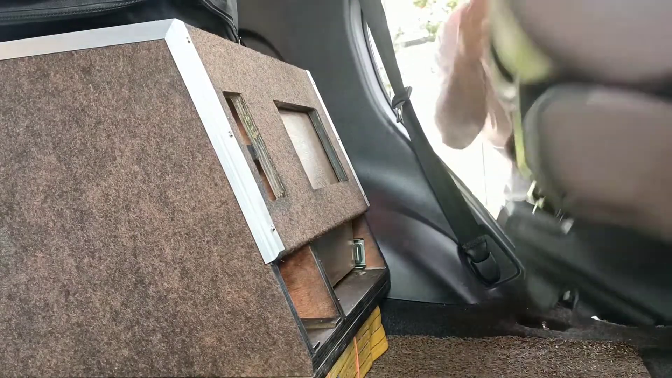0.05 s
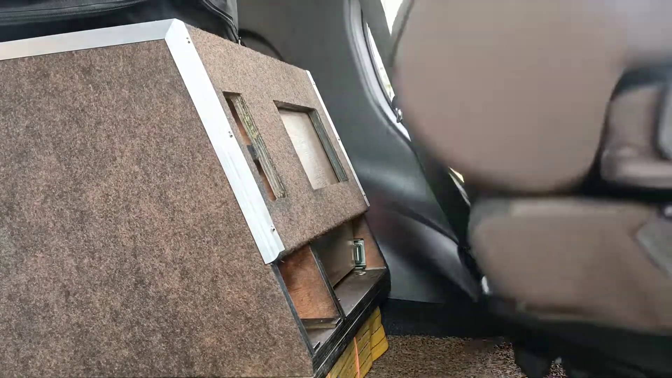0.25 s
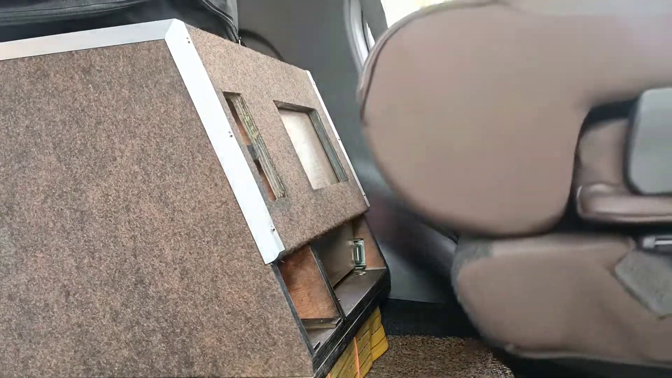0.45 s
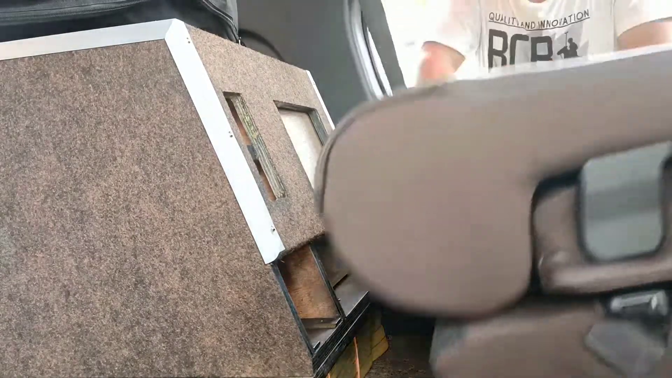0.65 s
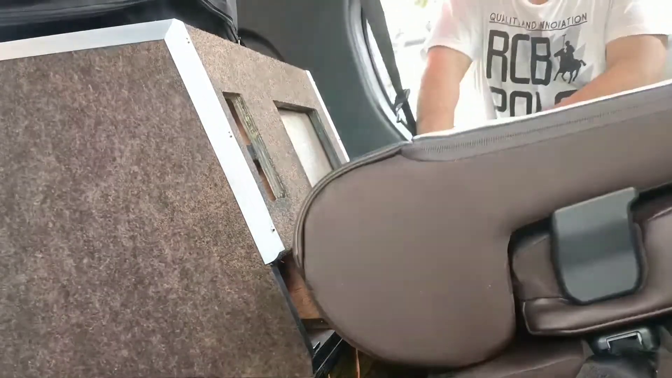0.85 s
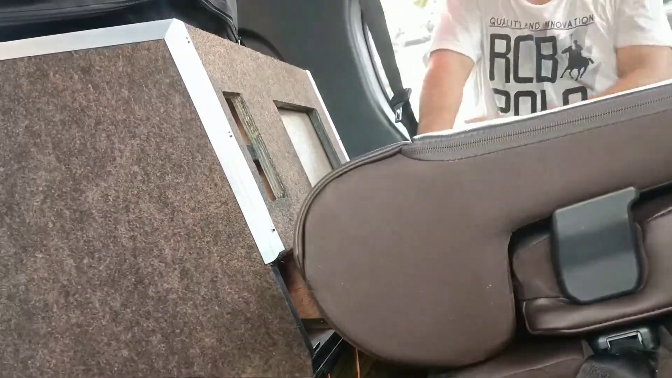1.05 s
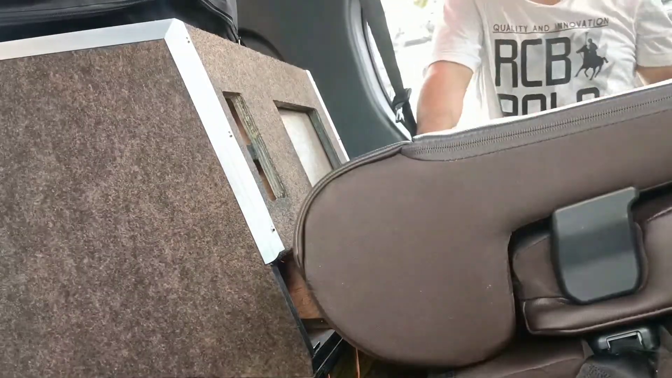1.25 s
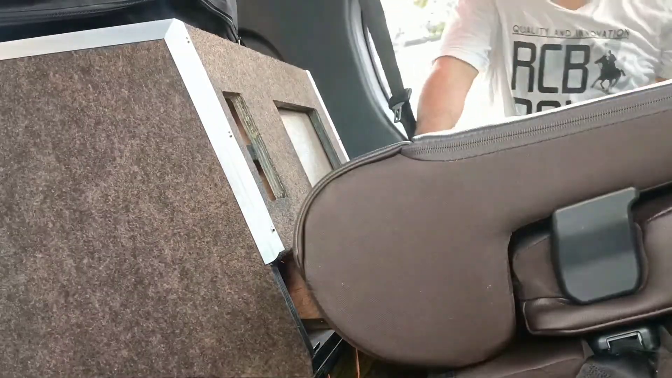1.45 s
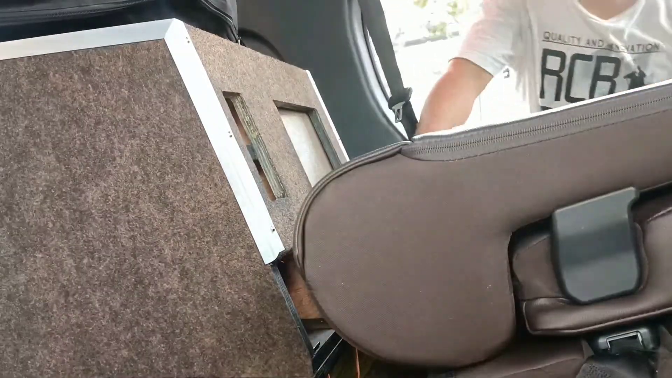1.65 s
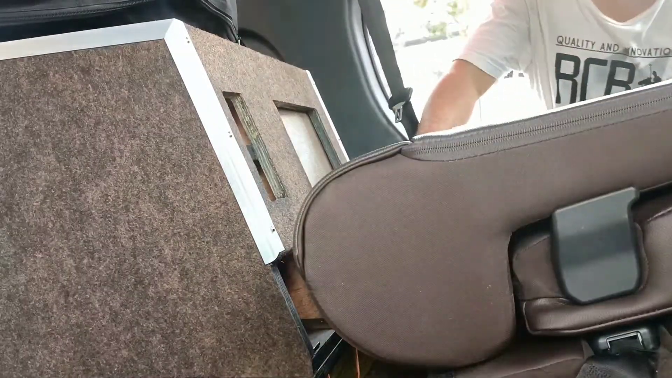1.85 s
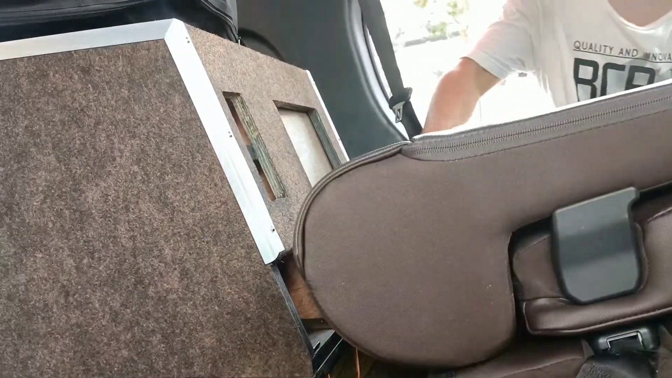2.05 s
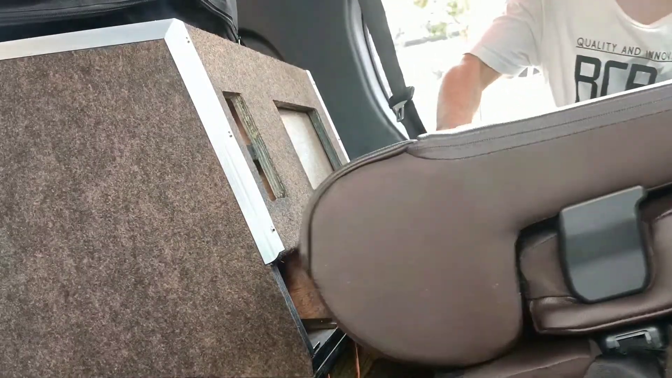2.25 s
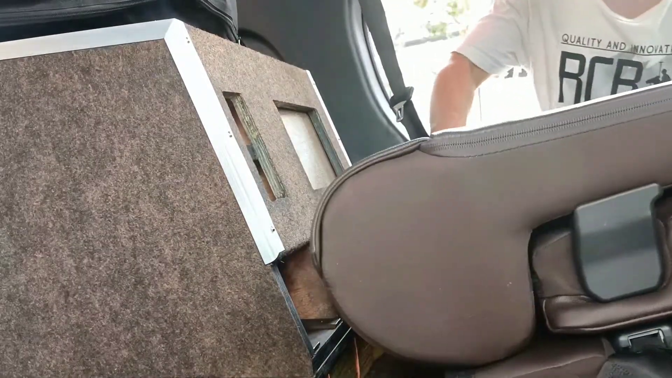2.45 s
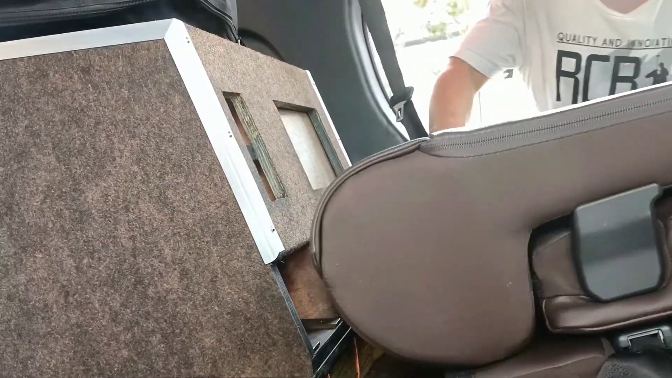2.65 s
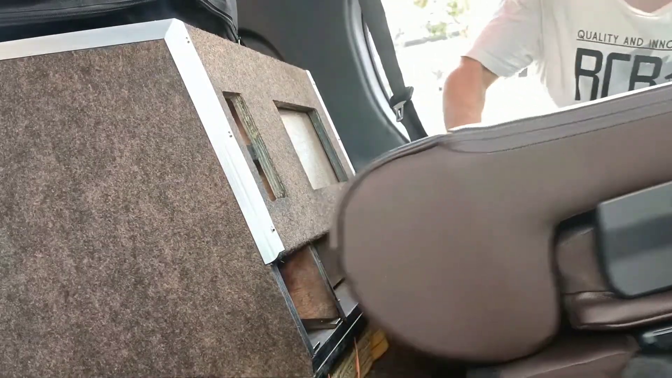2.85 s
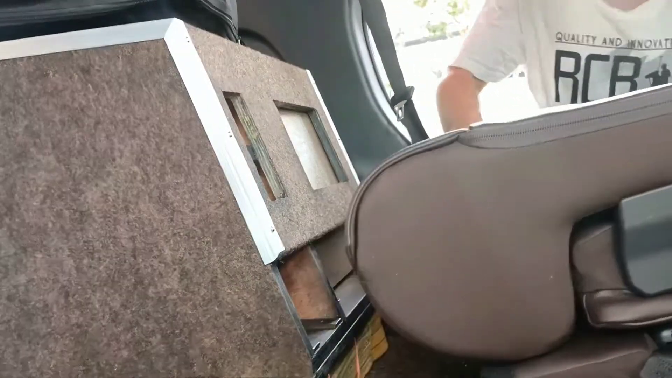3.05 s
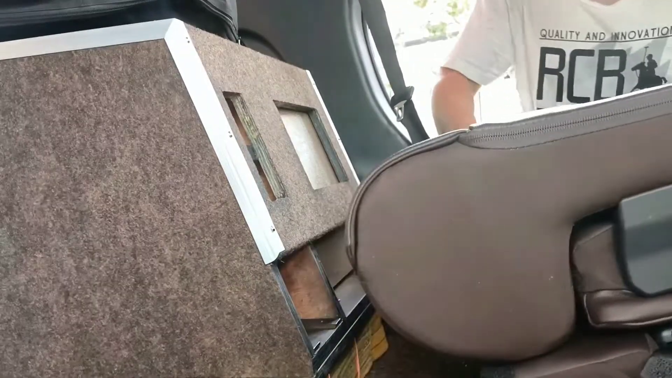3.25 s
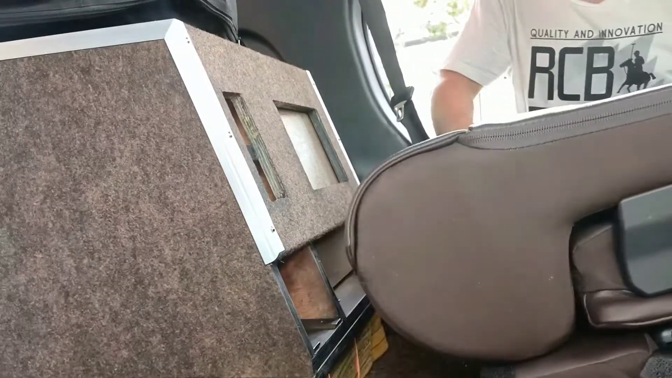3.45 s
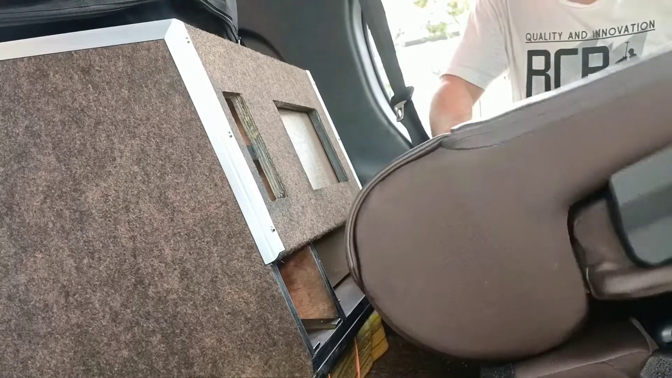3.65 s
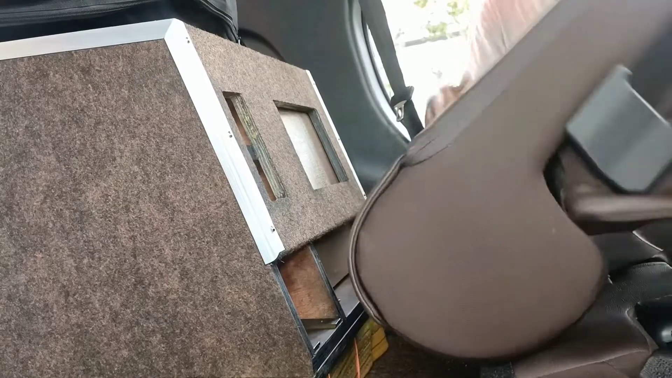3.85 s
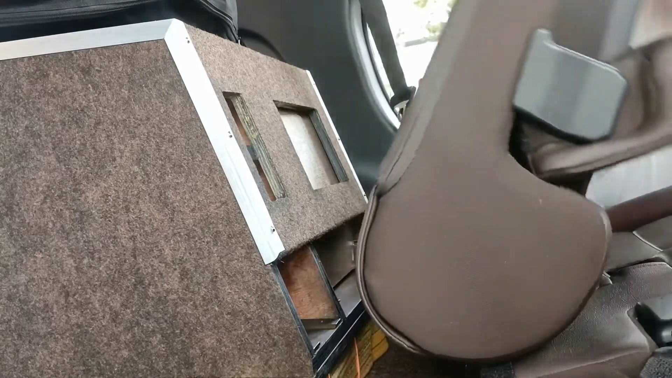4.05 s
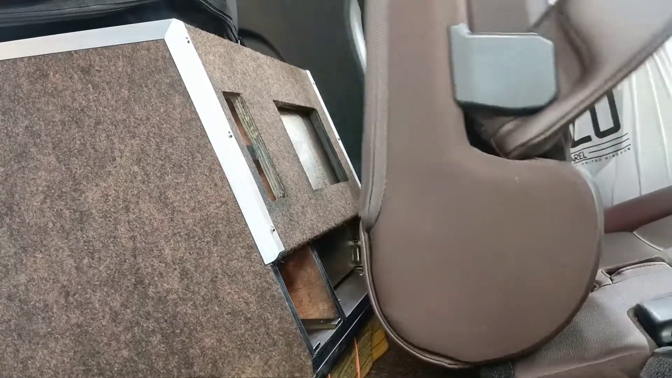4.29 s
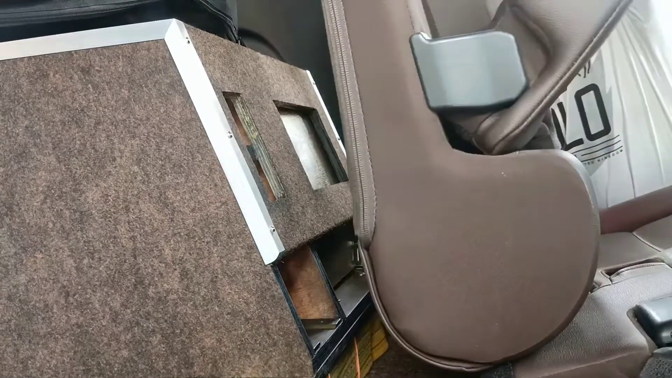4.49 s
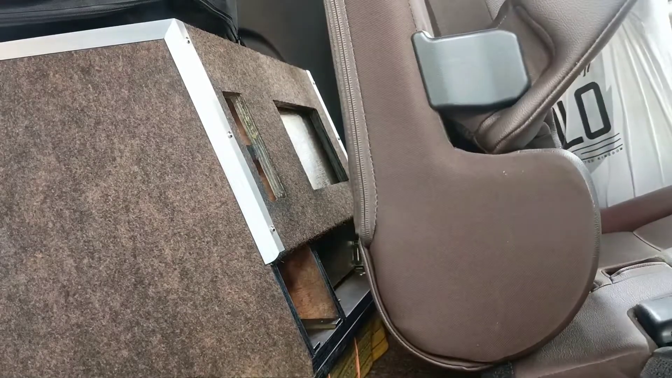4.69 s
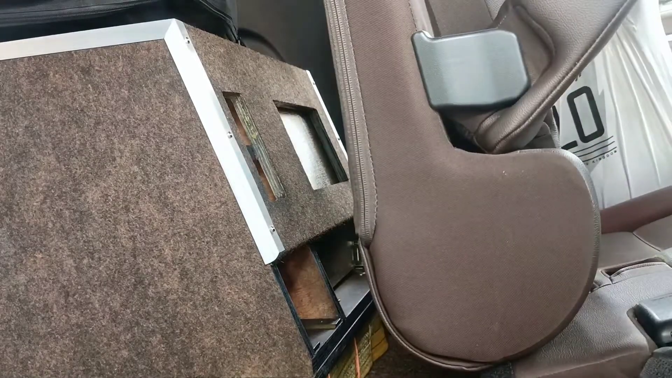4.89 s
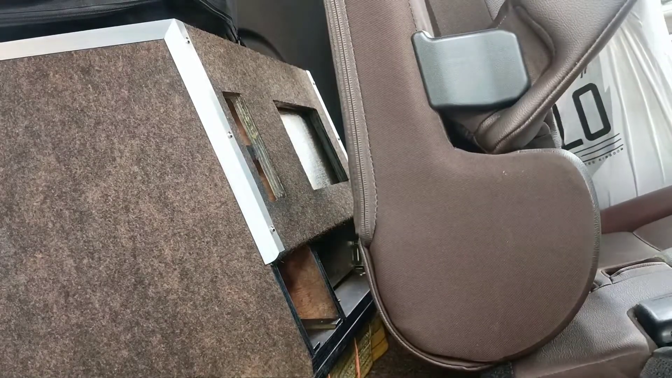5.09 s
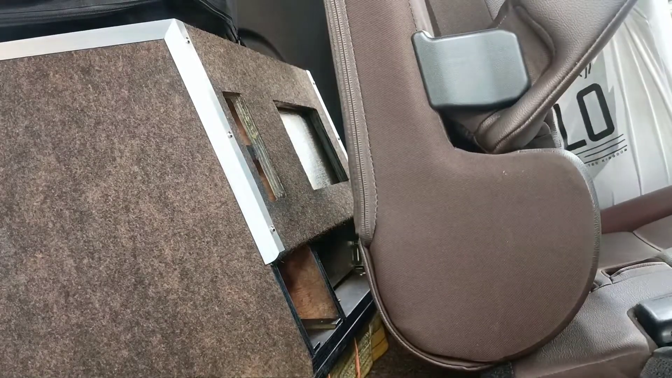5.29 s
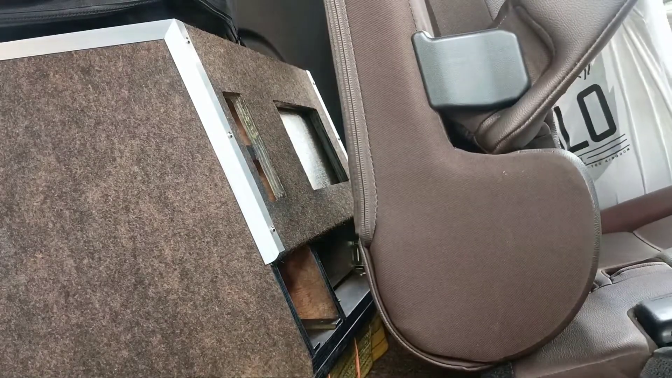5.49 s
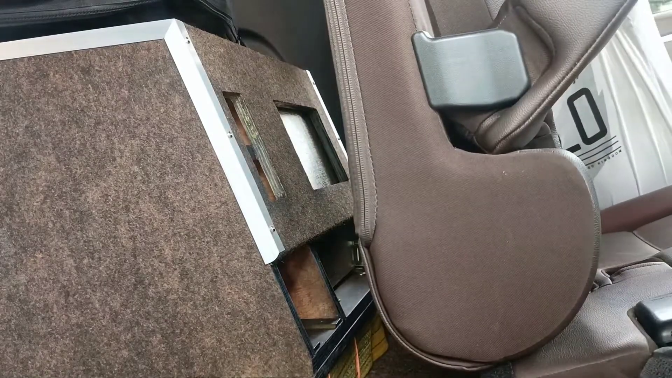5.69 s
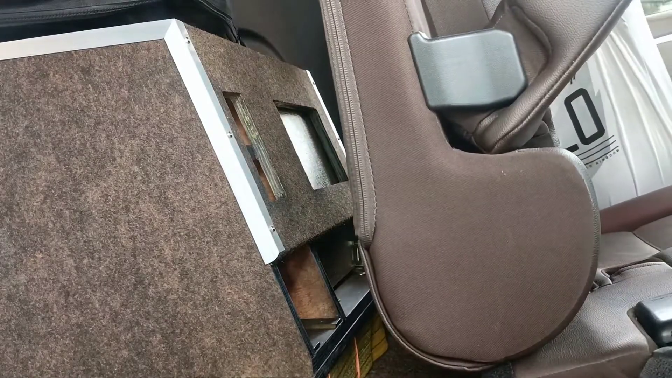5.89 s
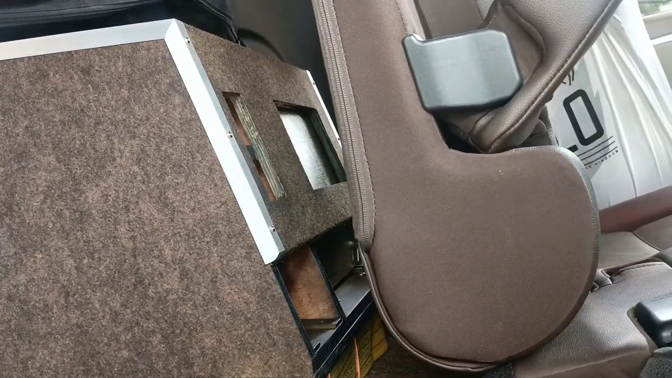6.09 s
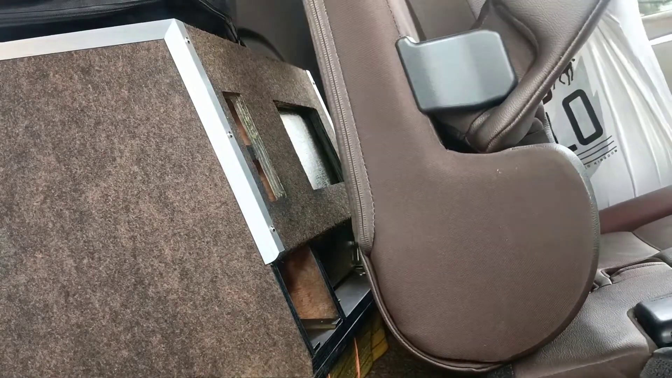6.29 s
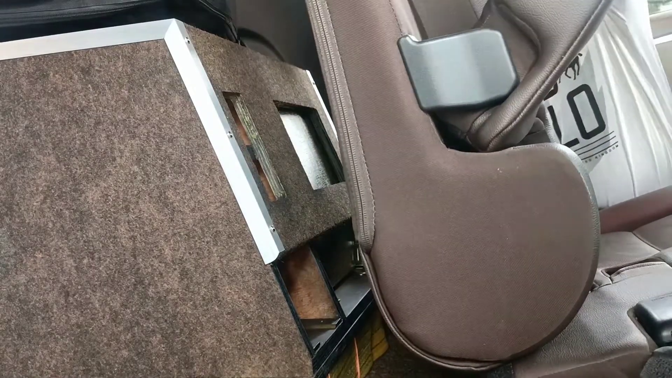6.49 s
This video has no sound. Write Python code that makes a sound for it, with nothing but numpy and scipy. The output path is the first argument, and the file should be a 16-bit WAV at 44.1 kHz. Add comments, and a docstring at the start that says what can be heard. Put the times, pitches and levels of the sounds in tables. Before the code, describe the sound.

Close inside a van, a padded metal-framed seat drops in a very loud cluster of clanks, panel knocks and a low boom. Quiet rubbing follows, then two solid knocking thuds as it slides to its stops. Upholstery rustles and hinges creak while it folds upright, landing with a softer clunk. After a near-quiet gap, a low scrape and creak lead to dull final clicks and thumps.

```python
"""Inside a van a heavy rear seat is dropped onto its floor latches, slid to its stops, folded and shoved back.
Each blow sums noise and damped modes: the steel frame clanks, floor panels knock, the cabin booms and reverberates.
Shaped noise in uneven slips makes the rubbing upholstery, rumbling runners and creaking hinges in between.
The van sways on its springs; outdoor hiss and a faint whine lie behind. Peaks saturate near full scale."""
import sys
import numpy as np
from scipy import signal
from scipy.fft import rfft, irfft, next_fast_len
from scipy.io import wavfile
from scipy.ndimage import map_coordinates

SR = 44100
rng = np.random.default_rng(int(sys.argv[2]) if len(sys.argv) > 2 else 0)


def put_to_file(sound):
    """Save the sound as 16-bit audio at rate SR, in the file named by the first command-line argument."""
    columns = np.atleast_2d(sound).T  # one column per channel
    safe = np.clip(columns, -1, 1)
    whole_steps = np.round(safe * 32767)
    wavfile.write(sys.argv[1], SR, whole_steps.astype(np.int16))


N = 287973

# Blows of the seat; sizzle is relative to the clank, decay is held within 0.02 to 0.6 s:
# start_s, clank_db, sizzle_db, panel_knock_db, low_thud_db, decay_t60_s
BLOWS = [(.15, -44.5, -11, -58, -48, 0.075), (.226, -38.5, -7, -41.5, -29, .15),
         (0.559, -40.5, -28, -56, -42, .11), (.685, -11.5, -21, -.6, -9.5, .13),
         (.706, -9, -11.5, -0.9, -3, 0.19), (.734, -8, -14, -2, -11.5, 0.058),
         (.754, -12, -12.5, -27, -8, 0.33), (.782, -4.5, -7.5, 1.5, -11, 0.089),
         (.827, -10, -32, -5, -11.5, 0.086), (1.379, -47, -0.5, -46, -27.5, .3),
         (1.431, -42, -4, -29.5, -41.5, 0.069), (1.709, -51.5, -5.5, -40, -33.5, 0.15),
         (2.002, -48, -26.5, -39.5, -44, 0.14), (2.071, -48, -10, -35.5, -37, 0.13),
         (2.305, -39, -26, -23.5, -30.5, 0.14), (2.35, -23.5, -13.5, -6, -16.5, 0.082),
         (2.382, -46.5, 1, -19, -14.5, 0.14), (2.51, -38.5, -7, -54, -35, 0.083),
         (2.596, -49.5, -4, -47, -41, 0.3), (2.751, -42.5, -24, -37.5, -33.5, 0.19),
         (2.843, -62, -18, -27.5, -21.5, 0.11), (2.87, -41, -15, -21, -12, 0.69),
         (2.929, -14, -16.5, 4, -1, 0.093), (2.957, -20, -15, -2, -4.5, .12),
         (2.999, -28, -9.5, -10.5, -13.5, .09), (3.291, -55, -18, -42, -30, 0.052),
         (3.522, -34, -32.5, -38, -36.5, 0.041), (3.966, -38.5, -27, -30.5, -48, 0.11),
         (4.281, -29, 3.5, -26.5, -36, 0.08), (4.469, -18.5, -16.5, -11, -18, 0.13),
         (4.494, -22.5, -11, -6, -13.5, 0.077), (4.565, -34, -15, -32, -45.5, .06),
         (4.781, -45.5, -10, -39, -38.5, 0.07), (4.833, -47, -7, -53.5, -53.5, 0.093),
         (5.112, -53, -0.5, -43, -34.5, 0.12), (5.32, -50.5, -15, -49, -40.5, 0.42),
         (5.643, -45.5, -12, -36, -42.5, 0.099), (5.745, -46.5, -10.5, -37.5, -33, 0.32),
         (5.809, -35, -17, -34, -36, .11), (5.864, -39, -17, -34, -52, 0.084),
         (6.079, -40, 4, -23.5, -38, .07), (6.096, -48.5, -13.5, -24, -29, 0.058),
         (6.122, -16.5, -21, -24.5, -19.5, 0.054), (6.18, -48, -13, -19, -20.5, 0.067),
         (6.306, -41.5, -15, -51, -34, 0.11), (6.448, -40, -6, -31, -33, .072),
         (6.468, -33.5, -15, -23.5, -24, .095), (6.49, -34.5, -14, -19, -20, 0.059)]
# Long low rings after heavy blows, of the cabin's lowest mode and a wooden cabinet:
# start_s, level_db, pitch_hz, rise_s, decay_t60_s
CABIN_BOOMS = [(0.722, 2, 37.9, 0.16, 0.61), (.76, -18, 179.4, 0.067, 1.18), (0.801, -18, 96.14, 0.055, 1),
               (2.37, 4.5, 36.05, 0.11, 0.45), (2.952, -4, 32.95, 0.049, 0.75),
               (4.492, -4, 35.8, 0.065, 0.64), (6.188, -10, 35.06, 0.09, 0.65),
               (6.463, -21, 39.7, 0.021, .5)]
# Modes of floor panels and steel frame, whose damping each blow scales: pitch_hz, level_db, decay_t60_s
PANEL_MODES = [(177, -16.5, 0.49), (214.4, 6.5, 0.095), (252, -4, 0.19), (295.6, 3.5, 0.095),
               (320.1, -14.5, 0.28), (369.7, -5, 0.14), (399.5, -12.5, 0.29), (439.2, -20, 0.23),
               (567, -24, 0.26), (639, -15, 0.14)]
STEEL_FRAME_MODES = [(773, -4.5, .3), (836, -3.5, 0.14), (878, -1.5, 0.4), (1065, -1, 0.29),
                     (1240, -9, 0.15), (1350, -7.5, 0.41), (1504, -0.5, 0.25), (1660, -12, 0.4),
                     (1706, -1.5, 0.24), (1991, 5.5, 0.19), (2130, -1.5, 0.23), (2589, 1, 0.23),
                     (2670, -13, .3)]
# Modes of the floorpan's low thud, damped by a fixed 0.96 of these rates: pitch_hz, level_db, decay_t60_s
FLOORPAN_MODES = [(63.7, -4, 0.4), (81.2, 4.5, 0.2), (96.3, -4, 0.39), (127.4, 6, 0.16)]
# Noise spectra of the metal in a blow: frequency_hz, relative_level_db (per Hz)
CLANK_SPECTRUM = [(300, 2), (700, 1.5), (1500, -6.5), (3000, -17.5), (5000, -23), (9000, -67)]
SIZZLE_SPECTRUM = [(1760, -32.5), (3000, -0.5), (4530, -6), (7280, -7), (8010, -10.5), (9260, -11.5),
                   (15500, -22)]
# Noise spectra of runners, hinges and frame, upholstery and its fine hiss: frequency_hz, relative_level_db (per Hz)
RUMBLE_SPECTRUM = [(32, -34), (55, 7.5), (123, -1), (243, -3.5), (307, -8), (383, -13), (446, -14),
                   (484, -23.5), (900, -27), (1170, -57.5), (1980, -120)]
CREAK_SPECTRUM = [(290, -22), (500, -2), (722, -5), (786, -4.5), (921, -4.5), (989, -7.5), (1420, -8),
                  (1530, -20), (2400, -14), (3120, -52), (5280, -120)]
CLOTH_SPECTRUM = [(880, -23.5), (1500, -0.5), (1970, 2), (3930, 2), (6000, -8), (7800, -35), (13200, -120)]
HISS_SPECTRUM = [(3240, -32), (5500, -5), (7070, -1), (12300, -8), (15500, -9)]
# Noise spectra of the swaying van and of the outdoors: frequency_hz, relative_level_db (per Hz)
SWAY_SPECTRUM = [(15, -20.5), (30, 4.0), (50, -1.5), (75, -32.5), (150, -93)]
OUTDOORS_SPECTRUM = [(15, -35.5), (25, -7.5), (55, -6.5), (126, -15.5), (209, -6), (267, -22), (598, -27),
                     (895, -27.5), (1750, -29), (2490, -32), (2850, -28), (5730, -41), (7500, -41),
                     (13500, -40.5), (15500, -41.5)]
# A faint narrow whine: pitch_hz, width_hz, mean_level_db
WHINE = (2455, 240, -69.5)
# Likeness of left and right noise: frequency_hz, correlation (-1 to 1)
LEFT_RIGHT_LIKENESS = [(60, 0.97), (150, 0.97), (380, 0.86), (950, 0.087), (2380, -0.2), (5980, 0.6),
                       (15000, 1)]
# Reverberation of the cabin: frequency_hz, decay_t60_s
CABIN_DECAY = [(100, 0.23), (500, 0.35), (2000, 0.41), (6000, 0.41), (14000, 0.043)]
# Cabin's answer to a blow, drier while the upright cushion muffles it: start_s, level_re_blow_db
CABIN_ANSWER = [(0.0, -9), (.8, -6.5), (2.3, -9), (3.1, -6), (3.5, -13.5), (4.9, -16.5), (5.2, -3.5),
                (6.0, -4.5), (6.15, -15), (6.53, -2.5)]
# The seat moving: start_s, runner_rumble_db, frame_creak_db, cloth_rub_db
FRICTION = [(0.0, -41, -53, -58.5), (.18, -64, -73, -65.5), (.6, -54, -55, -62.5),
            (1.35, -46.5, -60.5, -58), (1.53, -52.5, -75, -64.5), (1.8, -60.5, -66.5, -73),
            (2.07, -50, -54, -63), (2.22, -42.5, -55.5, -58), (2.55, -60, -79, -65.5),
            (2.75, -48.5, -53.5, -61.5), (3.4, -41.5, -66, -59.5), (3.58, -37.5, -55, -55.5),
            (3.72, -40, -50, -46.5), (3.86, -38, -46, -47.5), (4.05, -43, -54, -55),
            (4.38, -44, -57, -55.5), (4.58, -48, -77, -67), (4.85, -56, -79, -72),
            (5.22, -57.5, -69, -66.5), (5.69, -58, -74.5, -73), (5.8, -39, -50, -57.5),
            (6.0, -35, -43.5, -51.5), (6.24, -36, -55.5, -62), (6.53, -57, -52, -62)]
# Short rubs, narrow ones squeak and wide ones rustle: start_s, length_s, pitch_hz, width_hz, level_db
RUBS = [(0.519, .13, 1580, 60, -56), (0.535, 0.08, 824, 120, -51), (1.162, 0.086, 6000, 5160, -60),
        (1.319, 0.09, 3500, 1520, -52), (1.366, 0.19, 8700, 6160, -63), (1.84, 0.19, 1154, 59.3, -64),
        (1.949, 0.39, 947, 151, -58), (2.087, 0.14, 7100, 4200, -56.5), (2.488, 0.064, 970, 200, -48),
        (2.504, 0.038, 1750, 1580, -42.5), (2.749, .05, 1530, 1500, -57), (3.102, 0.11, 3870, 4000, -58),
        (3.2, 0.31, 13300, 82, -70), (3.874, 0.094, 814, 70, -49), (4.541, 0.038, 1990, 1800, -47),
        (5.36, 0.12, 1007, 400, -57.5), (5.745, 0.51, 292, 295, -40), (5.788, 0.44, 930, 945, -50.5),
        (5.804, 0.4, 1360, 220, -53), (6.33, 0.12, 970, 199.5, -51.5), (6.44, 0.11, 1810, 150, -59),
        (6.46, .14, 3630, 420, -48.5)]
# The van swaying on its springs: start_s, mean_level_db
SWAY_LEVELS = [(0.0, -46.5), (.7, -50), (1.5, -55.5), (2.2, -50.5), (2.8, -51), (3.3, -40), (3.9, -46),
               (4.4, -51), (5.5, -52), (6.2, -44.5)]

PAN_DB, PAN_SCATTER_DB = -2, 2  # right above left: the frame sits right of centre, blows scatter
ATTACK_S, ATTACK_SLOWS = 0.00096, 0.29  # rise of a clank at 0 dB; dB longer rise per dB weaker clank
SHUDDER_RISE_S, SHUDDER_T60_S = 0.069, 0.78
SHUDDER_RUMBLE_DB, SHUDDER_CREAK_DB, SHUDDER_CLOTH_DB = -16.5, -34.5, -33.5
CLOTH_SETTLES = 2.6  # power on the shudder: the cloth settles faster than the runners
TICKS_PER_S, TICK_SPREAD_DB, TICK_DB = 130, 1.5, -1.5  # small catches of the creak
HISS_DB = -2.3  # fine hiss relative to the cloth rub
OUTDOORS_DB, TOP_HZ = -54.5, 15750


def blows():
    """Impact excitation: each blow sets the damping of noise, frame and panels; the floorpan keeps its own."""
    out = np.zeros((2, N + SR))
    t = np.arange(SR * 2 // 3) / SR
    for start, clank_db, sizzle_db, knock_db, thud_db, t60 in BLOWS:
        pan_db = PAN_DB + PAN_SCATTER_DB * rng.standard_normal()
        answer_db = np.interp(start, *np.transpose(CABIN_ANSWER))
        t60 = np.clip(t60, .02, .6)
        attack = ATTACK_S * amp(-ATTACK_SLOWS * clank_db)
        onset = 1 - np.exp(-(t / attack) ** 2)
        # loose parts strike in a quick uneven run
        chatter = amp(2.1 * wobble(154.6, size=len(t)))
        chatter /= chatter[:SR // 100].mean()
        crack = 1 + 0.65 * np.exp(-t / 0.0033)  # the first contact is the sharpest
        fade = amp(-60 * t / t60) * onset * crack * chatter

        frame = amp(-7.5) * onset * ring(STEEL_FRAME_MODES, t, 0.0012, damping=0.21 / t60)
        rattle = rush(CLANK_SPECTRUM, size=len(t)) * fade + frame
        buildup = 1 - np.exp(-t / 0.0029)
        sizzle = amp(sizzle_db) * rush(SIZZLE_SPECTRUM, size=len(t)) * fade * buildup
        metal = amp(clank_db) * (rattle + sizzle) * amp([[pan_db / 2], [-pan_db / 2]])
        knock = amp(knock_db) * ring(PANEL_MODES, t, 0.0044, damping=0.13 / t60)
        knock = knock * amp([[1.1], [-1.1]])  # slightly left
        thud = amp(thud_db) * ring(FLOORPAN_MODES, t, 0.0094, damping=0.96)

        answer = cabin(amp(answer_db) * metal + amp(answer_db - 7.5) * knock + amp(-18.5) * thud)
        lumps = amp(1.7 * wobble(45, size=len(t)))  # the tail comes in lumps
        out[:, round(start * SR):][:, :len(t)] += metal + knock + thud + lumps * answer
    return out[:, :N]


def ring(modes, t, attack, damping):
    """Modal superposition: damped sines, newly weighted and detuned at each blow; peak 1."""
    hz, db, t60 = np.transpose(modes)[:, :, None]
    scatter_db = 3.76 * rng.standard_normal(db.shape)
    strength = amp(db + scatter_db - 60 * t * damping / t60)
    detune = 1 + 0.019 * rng.standard_normal(hz.shape)
    partials = strength * np.sin(2 * np.pi * hz * detune * t)
    sound = partials.sum(0) * (1 - np.exp(-t / attack))
    return sound / np.abs(sound).max()


def cabin(x):
    """Diffuse reverberation: convolution with noise whose frequencies each decay at their own rate."""
    hz, t, grid = signal.stft(rng.standard_normal((2, SR // 2)), SR, nperseg=256)
    decay = amp(-60 * t / along(CABIN_DECAY, hz)[:, None])
    tail = signal.istft(grid * decay, SR, nperseg=256)[1]
    tail /= np.linalg.norm(tail[0])
    return signal.fftconvolve(x, tail, axes=1)[:, :x.shape[1]]


def booms():
    """Low-frequency resonance: each mode swells after a blow and decays exponentially."""
    out = np.zeros(N + SR)
    t = np.arange(SR) / SR
    for start, db, hz, rise, t60 in CABIN_BOOMS:
        swell = (1 - np.exp(-t / rise)) * amp(db - 60 * t / t60)
        out[round(start * SR):][:SR] += swell * np.sin(2 * np.pi * hz * t)
    return out[:N]


def friction():
    """Stick-slip friction: shaped noise in uneven slips, with lumps at several speeds."""
    rumble_db, creak_db, cloth_db = curves(FRICTION)
    slips, grit, shake = wobble(45), wobble(300), shudder()
    # motion and shudder add as powers
    rumble_level = np.hypot(amp(rumble_db), amp(SHUDDER_RUMBLE_DB) * shake)
    creak_level = np.hypot(amp(creak_db), amp(SHUDDER_CREAK_DB) * shake)
    cloth_level = np.hypot(amp(cloth_db), amp(SHUDDER_CLOTH_DB) * shake ** CLOTH_SETTLES)

    rumble = unit(amp(1.6 * slips) * rush(RUMBLE_SPECTRUM))
    catching = amp(2.2 * slips + 3.0 * wobble(150)) * (1 + amp(TICK_DB) * ticks())
    creak = unit(catching * rush(CREAK_SPECTRUM))
    cloth = unit(amp(.8 * slips + 1.3 * grit) * rush(CLOTH_SPECTRUM))
    hiss = amp(HISS_DB) * unit(amp(0.51 * wobble(18) + 1.6 * grit) * rush(HISS_SPECTRUM))
    return rumble_level * rumble + creak_level * creak + cloth_level * cloth + amp(cloth_db) * hiss


def shudder():
    """Transient response: the seat shudders on its runners after a blow, as hard as the blow's thud."""
    kicks = np.zeros(N)
    t = np.arange(SR) / SR
    starts = [round(row[0] * SR) for row in BLOWS]
    np.add.at(kicks, starts, [amp(row[4]) for row in BLOWS])
    swell = (1 - np.exp(-t / SHUDDER_RISE_S)) * amp(-60 * t / SHUDDER_T60_S)
    return np.abs(signal.fftconvolve(kicks, swell)[:N])


def ticks(size=N):
    """Random pulse process: envelope of scattered short catches, rms 1."""
    struck = rng.random(size) < TICKS_PER_S / SR
    sizes = struck * amp(TICK_SPREAD_DB * rng.exponential(size=size))
    decay = np.exp(-np.arange(SR // 20) / SR / 0.0044)
    return unit(np.abs(signal.fftconvolve(sizes, decay)[:size]))


def rubs():
    """Stick-slip in one resonance: band noise broken by catches, swelling and fading."""
    out = np.zeros((2, N + SR))
    for start, length, hz, width, db in RUBS:
        n = round(length * SR)
        catches = 0.62 + 0.54 * ticks(size=n)
        swell = amp(db + 2.06 * wobble(89.1, size=n)) * np.hanning(n) ** 0.19 * catches
        out[:, round(start * SR):][:, :n] += swell * rush(band(hz, width), size=n)
    return out[:, :N]


def sway():
    """Suspension motion: very low noise of slowly varying level as the van sways on its springs."""
    return amp(curves(SWAY_LEVELS)[0] + 2.0 * wobble(2)) * rush(SWAY_SPECTRUM)


def outdoors():
    """Ambient noise: distant hiss through the open door and a faint wavering narrow-band whine."""
    hz, width, db = WHINE
    whine = amp(db + 3.3 * wobble(22)) * rush(band(hz, width))
    return amp(OUTDOORS_DB + 0.6 * wobble(2.6)) * rush(OUTDOORS_SPECTRUM) + whine


def rush(spectrum, size=N):
    """Partial coherence: stereo noise of rms 1, mid and side weighted to set the left-right likeness."""
    def mid_and_side(hz):
        turn = np.arccos(np.clip(along(LEFT_RIGHT_LIKENESS, hz), -1, 1)) / 2
        return amp(along(spectrum, hz)) * [np.cos(turn), np.sin(turn)]

    mid, side = filtered(rng.standard_normal((2, size)), mid_and_side)
    return unit(np.array([mid + side, mid - side]))


def band(hz, width):
    """Resonance curve: (frequency_hz, level_db) points falling away on both sides of one peak."""
    ratio = 1 + width / hz
    skirts = ((-3, -60), (-.5, -5), (0, 0), (.5, -5), (3, -60))  # (power of ratio, dB)
    return [(hz * ratio ** power, db) for power, db in skirts]


def filtered(x, response):
    """Linear filtering: the spectrum of x times a response of frequency."""
    n = x.shape[-1]
    padded = next_fast_len(n + 8192)
    return irfft(rfft(x, padded) * response(np.fft.rfftfreq(padded, 1 / SR)), padded)[..., :n]


def wobble(rate, size=N):
    """Random modulation: a smooth curve through normal draws, rate knots a second."""
    knots = rng.standard_normal(int(size * rate / SR) + 4)
    return map_coordinates(knots, [np.arange(size) * rate / SR])


def curves(rows):
    """Linear interpolation in time: one value per sample for each column after the time."""
    s, *columns = np.transpose(rows)
    return [np.interp(np.arange(N) / SR, s, column) for column in columns]


def along(points, hz):
    """Logarithmic frequency scale: (Hz, value) points interpolated along it."""
    f, v = np.transpose(points)
    return np.interp(np.log(hz + 1), np.log(f + 1), v)


def amp(db):
    """Decibel law: amplitude gain of a level in dB."""
    return 10 ** (np.asarray(db) / 20)


def unit(x):
    """Power normalisation: x at rms 1."""
    return x / np.sqrt(np.mean(x ** 2) + 1e-20)


def scene():
    """Superposition of all sources, from the blows to the outdoors."""
    return blows() + booms() + friction() + rubs() + sway() + outdoors()


def record(dry):
    """Saturation and band limiting: peaks flatten near full scale, then all from TOP_HZ up is removed."""
    clipped = dry / (1 + np.abs(dry / .97) ** 16) ** (1 / 16)
    return filtered(clipped, lambda hz: hz < TOP_HZ)


dry = scene()
out = record(dry)
put_to_file(out)
```